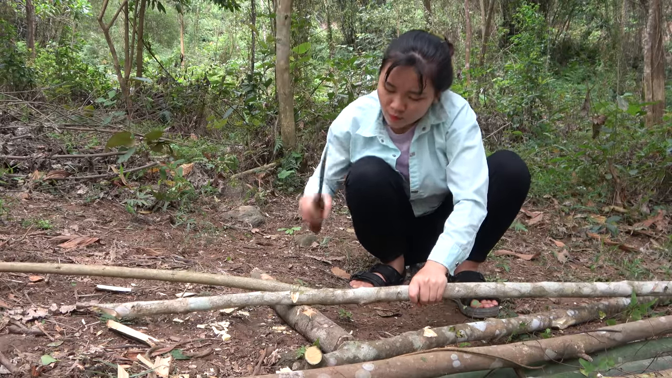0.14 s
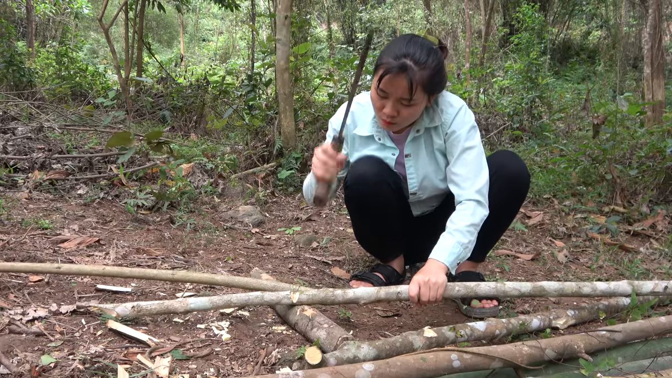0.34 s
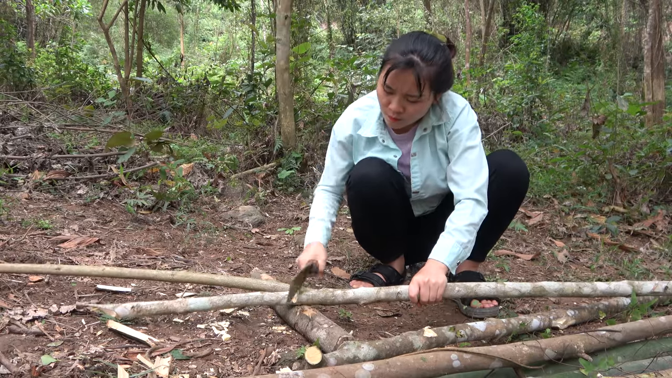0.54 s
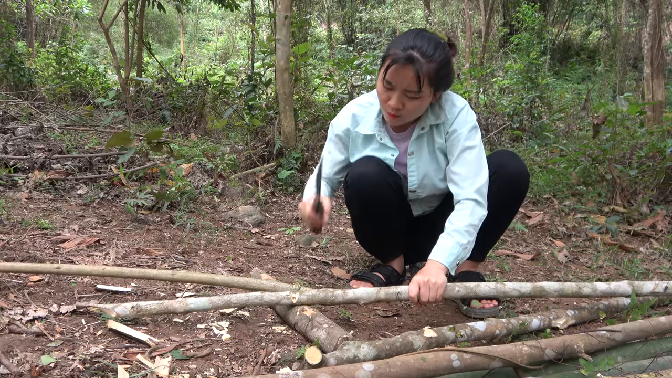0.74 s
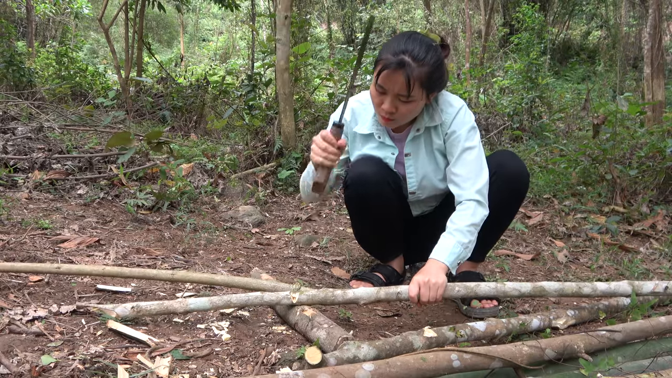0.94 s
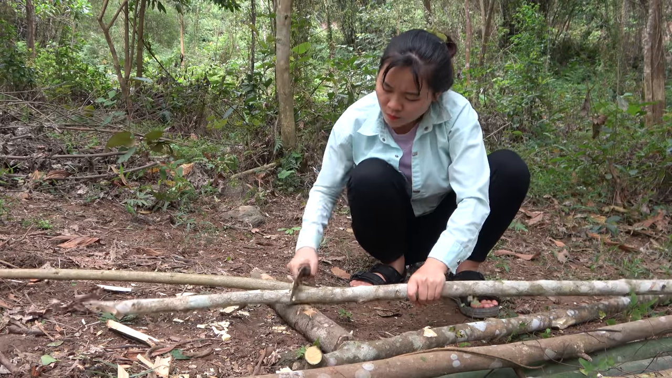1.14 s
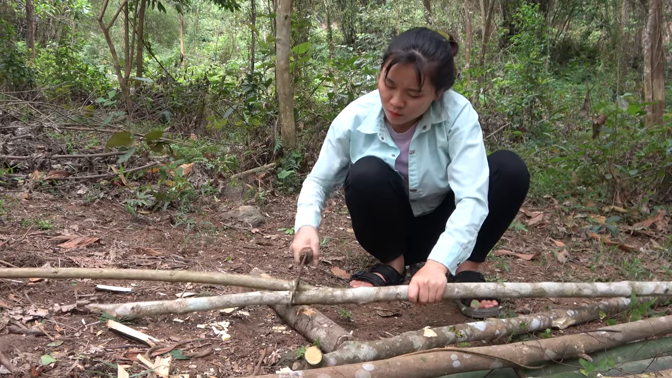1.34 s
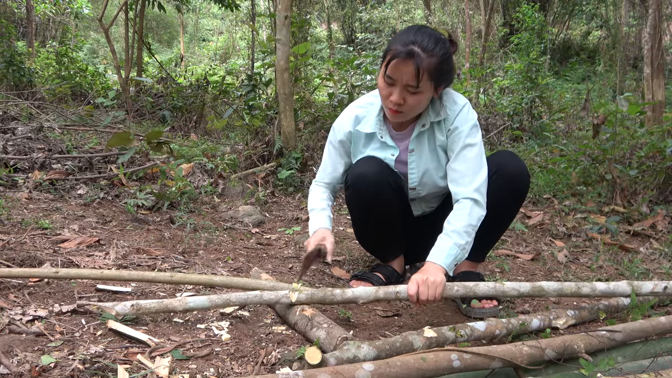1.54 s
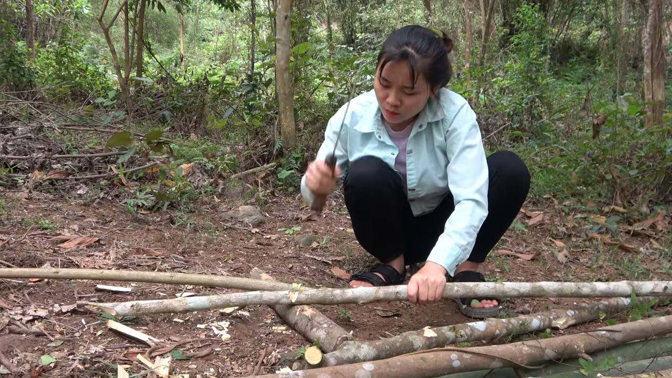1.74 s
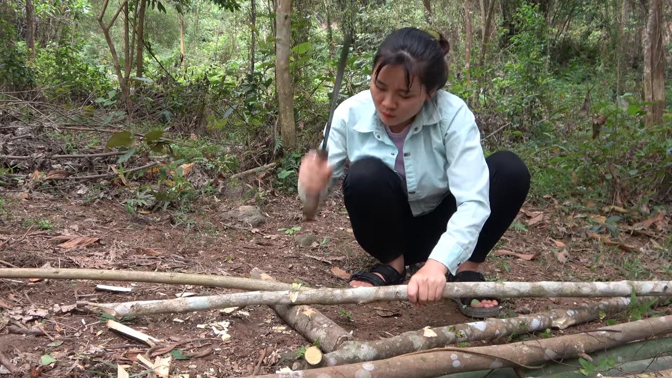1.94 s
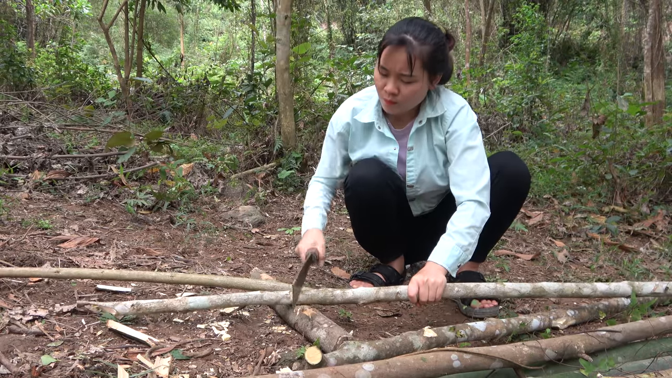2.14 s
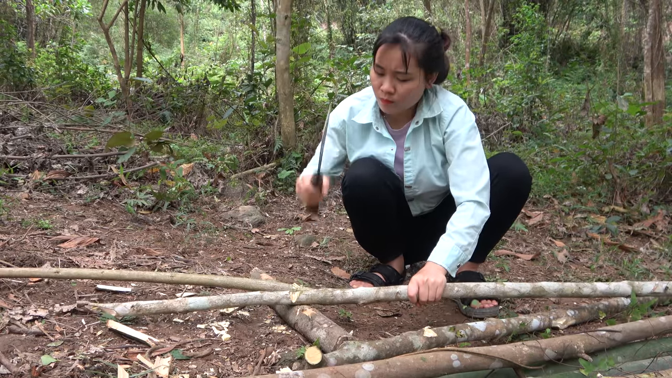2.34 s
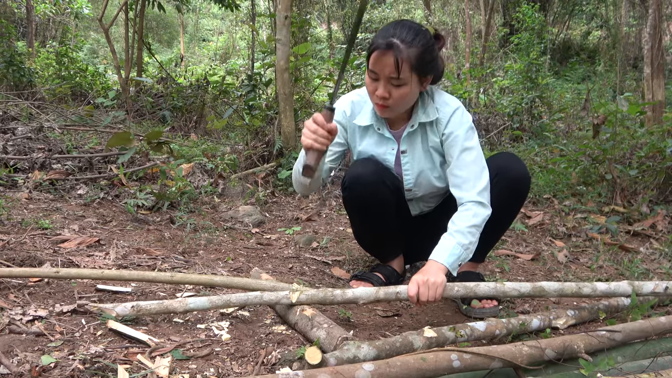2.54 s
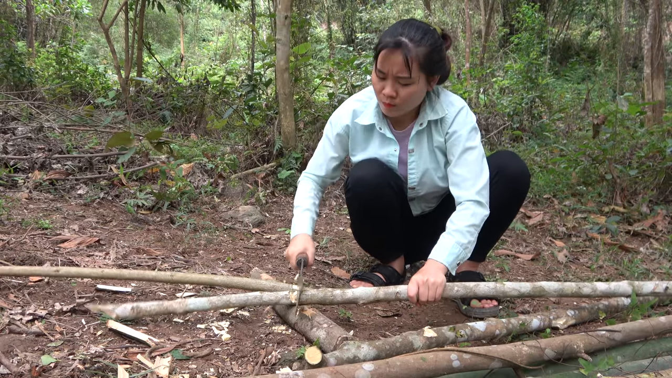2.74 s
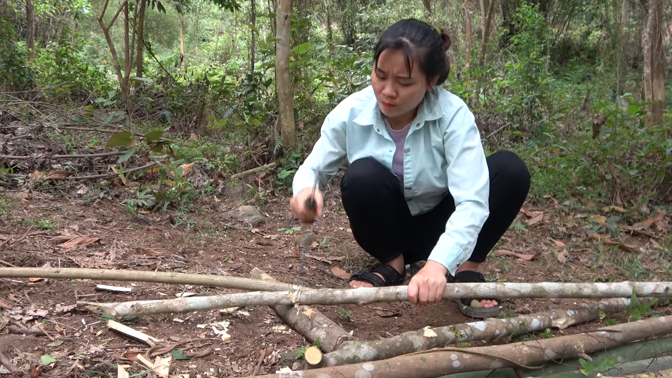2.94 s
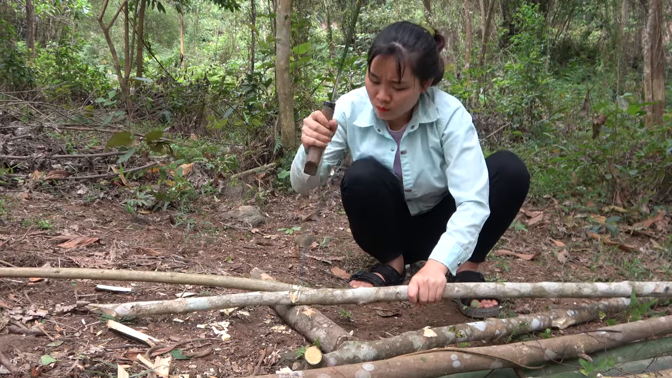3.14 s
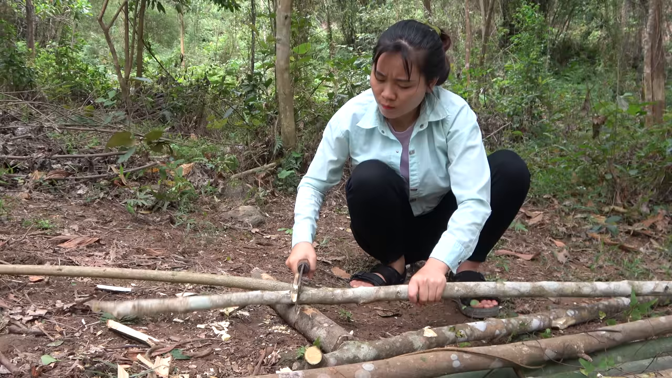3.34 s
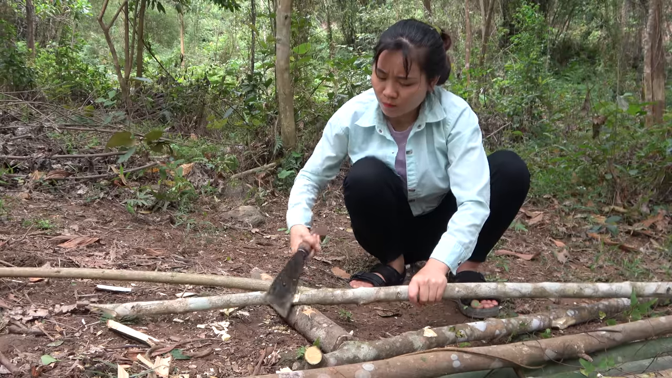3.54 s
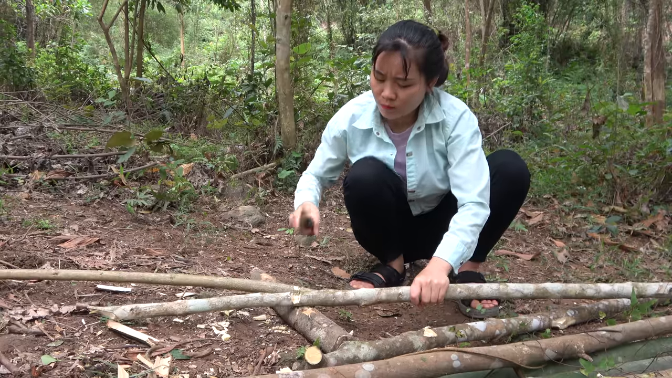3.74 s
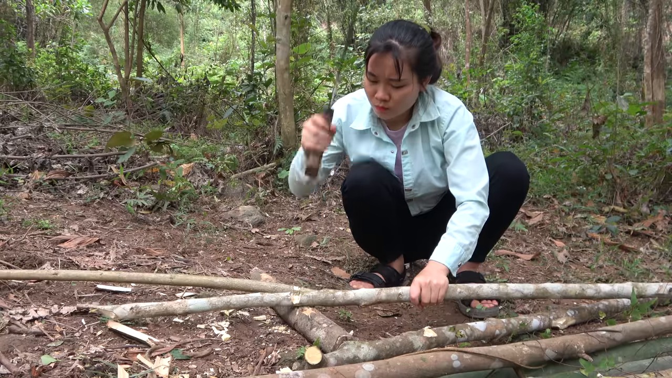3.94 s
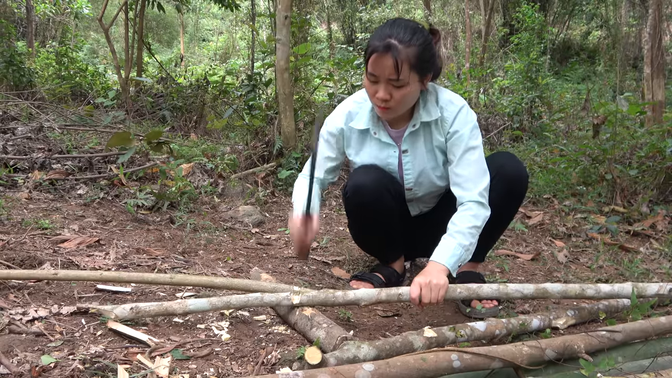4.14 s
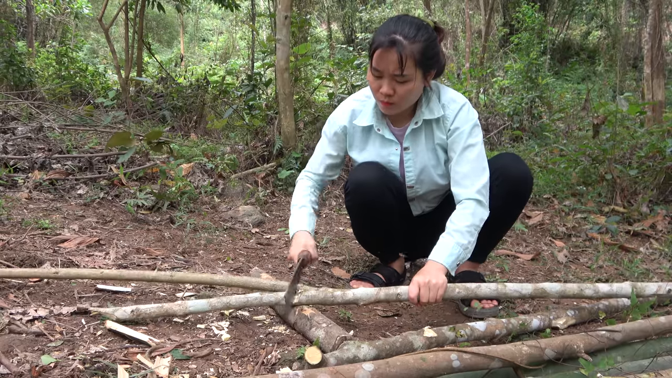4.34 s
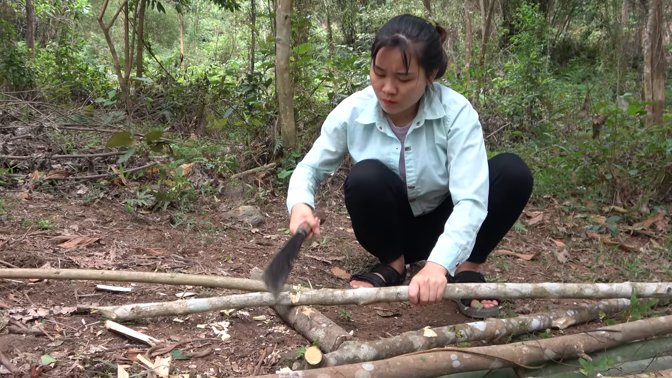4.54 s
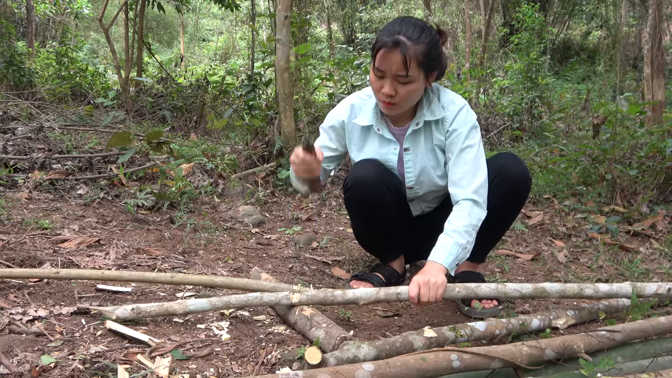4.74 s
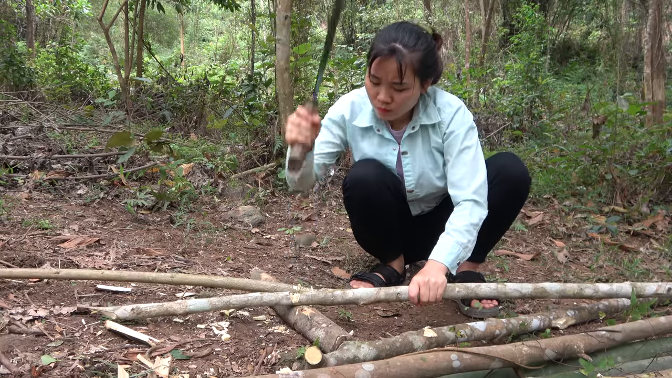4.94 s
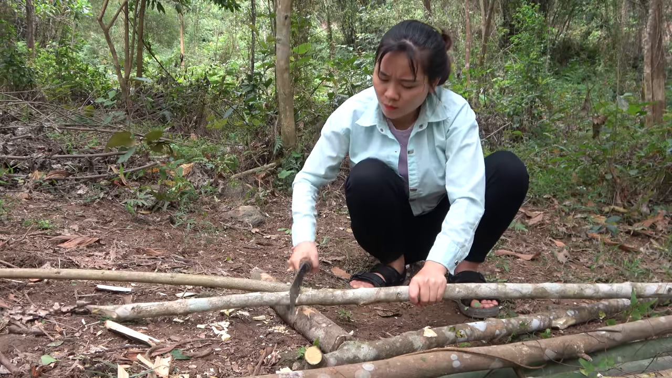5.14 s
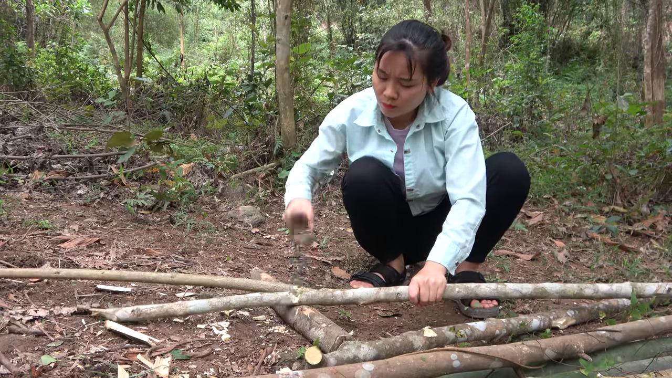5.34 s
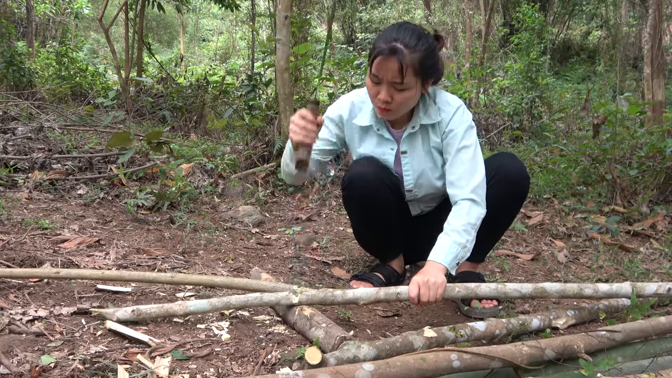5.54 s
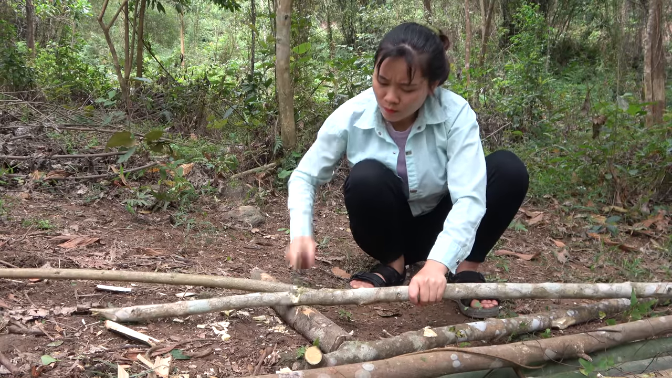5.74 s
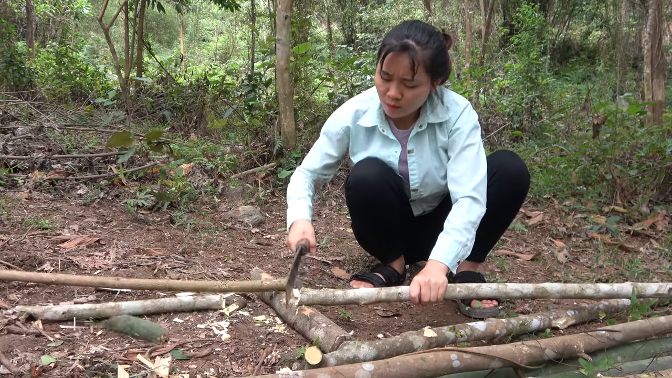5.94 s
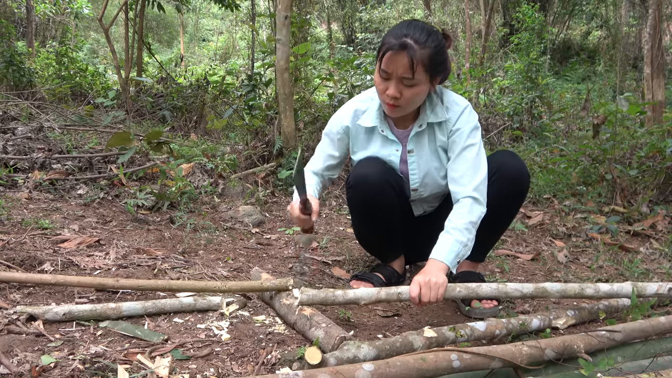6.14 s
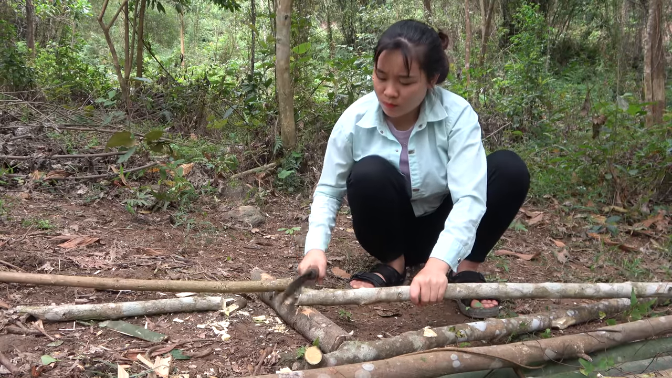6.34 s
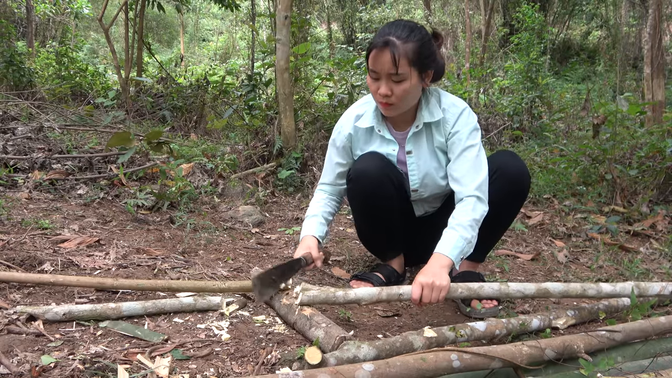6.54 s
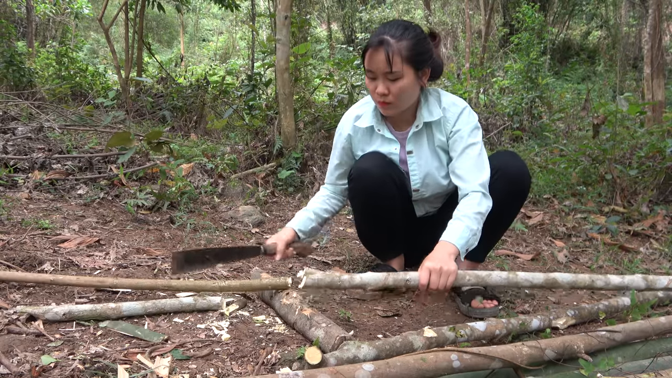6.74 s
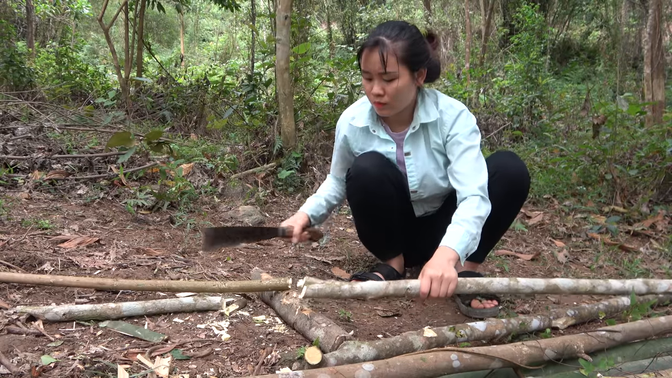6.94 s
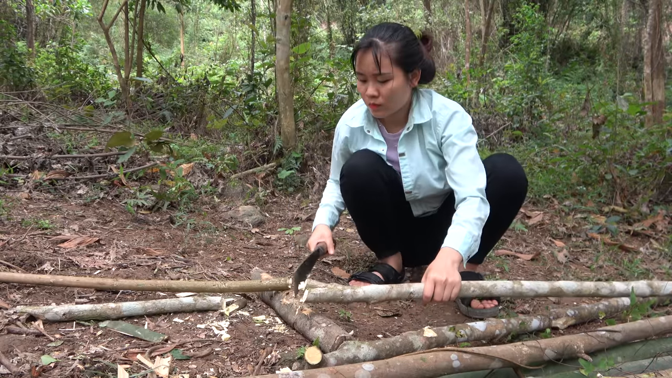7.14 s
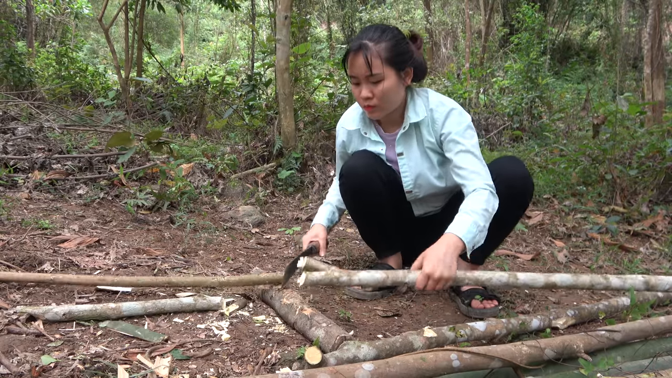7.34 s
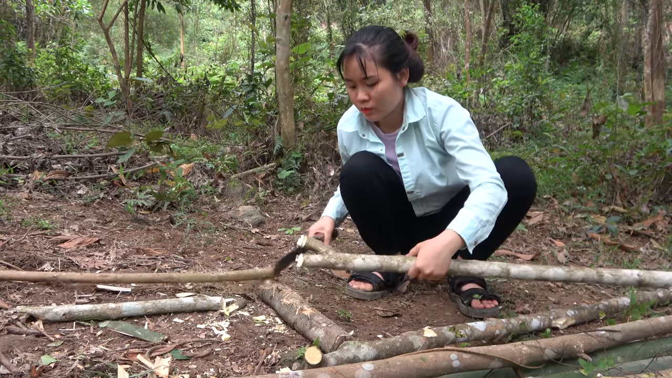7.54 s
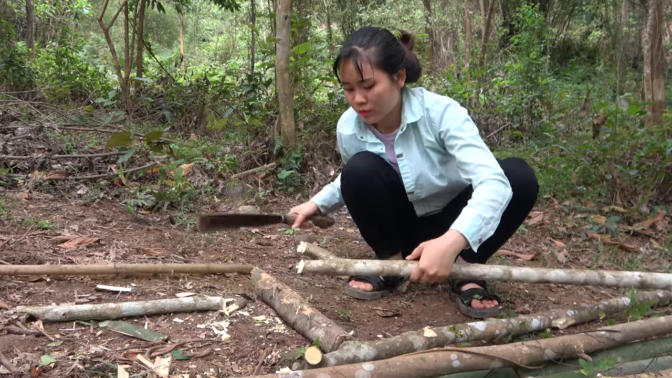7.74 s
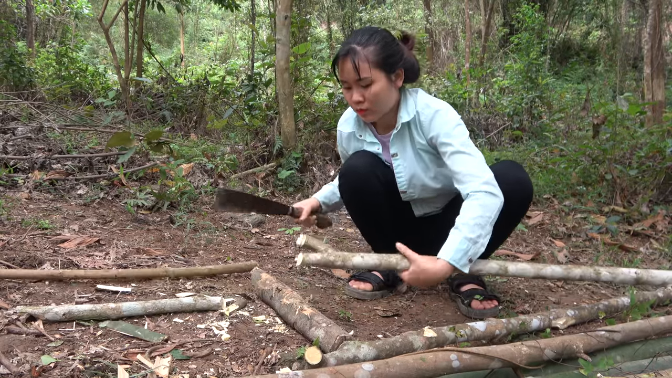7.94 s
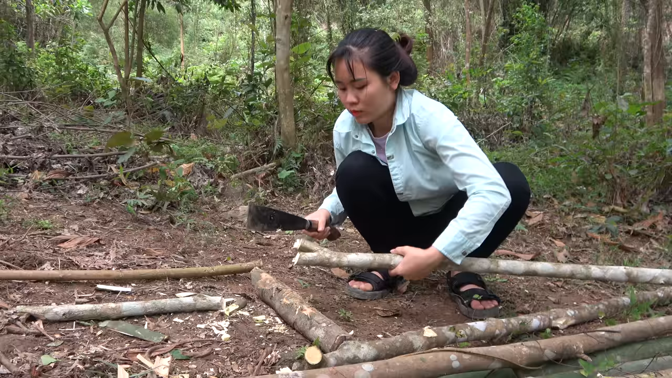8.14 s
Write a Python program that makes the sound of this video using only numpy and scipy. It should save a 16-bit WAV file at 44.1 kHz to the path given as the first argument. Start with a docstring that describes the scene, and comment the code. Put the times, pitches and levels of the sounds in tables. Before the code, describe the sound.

A heavy blade chops a thin wooden pole in separate woody cracks with hollow thumps, echoing among trees over a steady insect drone.

```python
"""Insects drone in narrow noise bands over a forest hush; a bird first repeats a falling whistle.
A machete meanwhile chops a thin pole lying across a log: shaped bursts crack the fibres and knock the wood,
decaying modes thump the ground and ring the bouncing pole, and dense scatter off the trunks echoes each blow.
The blade squeaks once after the third blow; chips snap and wood bumps between later ones.
After the tenth blow the free blade clinks, then the cut pole is lifted out of crackling leaf litter."""
import sys
import numpy as np
from scipy import signal
from scipy.fft import rfft, irfft, next_fast_len
from scipy.io import wavfile

SR = 44100
rng = np.random.default_rng(int(sys.argv[2]) if len(sys.argv) > 2 else 0)


def transcribe(signal):
    """Save signal, clipped to [-1, 1], as a 16-bit WAV file at the path in sys.argv[1]."""
    frames = np.atleast_2d(signal).T
    limited = np.clip(frames, -1, 1)
    pcm = np.round(limited * 32767).astype(np.int16)
    wavfile.write(sys.argv[1], SR, pcm)


N = 361619
CLOCK = np.arange(N) / SR  # whole scene, s
T = np.arange(3 * 2 ** 13) / SR  # one event, s


def undb(db):
    """Decibels to gain."""
    return 10 ** (np.asarray(db) / 20)


def unit(x):
    """Scale to rms 1."""
    return x / np.sqrt(np.mean(x ** 2))


def along(points, hz):
    """Read a table on a log-frequency axis."""
    f, value = np.transpose(points)
    return np.interp(np.log(hz), np.log(f), value)


def bell(hz, centre_hz, octaves):
    """A bell of height 1 on a log-frequency axis."""
    return np.exp(-.5 * (np.log2(hz / centre_hz) / octaves) ** 2)


def fall(t60_s):
    """Exponential decay by 60 dB in t60_s."""
    return np.exp(-np.log(1000) * T / t60_s)


def evenly(start_s, every_s, count):
    """Times at an even pace."""
    return start_s + every_s * np.arange(count)


def stereo(mid, side=0):
    """Left and right from mid and side."""
    return np.array([mid + side, mid - side])


def add(out, start_s, x):
    """Mix a stereo sound in at start_s, cut to the scene."""
    i = int(round(start_s * SR))
    lo, hi = max(i, 0), min(i + x.shape[1], N)
    out[:, lo:hi] += x[:, lo - i:hi - i]


def noise(gain, size):
    """Noise of rms 1 whose spectrum follows the function gain(hz)."""
    padded = next_fast_len(size)
    hz = np.fft.rfftfreq(padded, 1 / SR) + 1
    random_phase = np.exp(2j * np.pi * rng.random(len(hz)))
    return unit(irfft(gain(hz) * random_phase, padded)[:size])


def walk(rate_hz):
    """Smooth random wandering with a spread of 1."""
    return noise(lambda hz: np.exp(-(hz - 1) / rate_hz), N)


def coloured(x, gain):
    """Give white noise the spectrum gain(hz) and keep its power."""
    hz = np.fft.rfftfreq(len(T), 1 / SR) + 1
    return irfft(rfft(x) * unit(gain(hz)), len(T))


def burst(gain, length_s):
    """Dense splintering of colour gain(hz), peaking near rms 1 after half its length."""
    u = 2 * T / length_s
    return u * np.exp(1 - u) * coloured(rng.standard_normal(len(T)), gain)


def ring(modes, scatter_db, detune):
    """Modes that build up and decay; every call weights and detunes them a little differently."""
    out = 0
    for hz, level_db, t60_s, rise_s in modes:
        weight, shift, phase_cycles = rng.standard_normal(3)
        shape = (1 - np.exp(-(T / rise_s) ** 2)) * fall(t60_s)
        wave = np.sin(2 * np.pi * (hz * (1 + detune * shift) * T + phase_cycles))
        out = out + undb(level_db + scatter_db * weight) * shape * wave
    return out


# colour of the trunk scatter: pitch_hz, level_db
ECHO_COLOUR = [(60, -10), (250, -9), (600, -18.5), (1300, -7.5), (2600, -0.5), (5000, 0.5), (8000, -0.5),
               (15000, 1)]
# decay among the trunks: pitch_hz, t60_s
TRUNK_DECAY = [(100, 0.3), (600, 0.42), (1300, 0.26), (3000, 0.39), (6000, 0.37), (10000, 0.3),
               (15000, 0.21)]


def forest(first_s=.013, build_s=0.0068, late_db=-26, late_t60_s=1.0, side_db=-3):
    """Forest echo: a gap, then dense scatter off near trunks and a faint tail from far ones."""
    hz = np.fft.rfftfreq(len(T), 1 / SR) + 1
    white = stereo(rng.standard_normal(len(T)), undb(side_db) * rng.standard_normal(len(T)))
    scatter = rfft(white) * undb(along(ECHO_COLOUR, hz))
    late = undb(late_db) * fall(late_t60_s)
    centres_hz, t60s_s = np.transpose(TRUNK_DECAY)
    out = 0
    for t60_s, share in zip(t60s_s, np.eye(len(centres_hz))):
        # overlapping bands that sum to the full spectrum
        band = irfft(scatter * np.interp(np.log(hz), np.log(centres_hz), share), len(T))
        out = out + band * (fall(t60_s) + late)
    return out * np.clip((T - first_s) / build_s, 0, 1) * undb(-28.5)


def echo(x, trunks, db):
    """What the trunks send back of a mono sound, by convolution."""
    return undb(db) * signal.fftconvolve(x[None], trunks, axes=1)[:, :len(x)]


def hit(gain, length_s, echo_db, side_db=-6):
    """Burst plus echo; each trunk gets another side of it, so only the broad colour comes back."""
    direct = stereo(burst(gain, length_s), undb(side_db) * burst(gain, length_s))
    return direct + undb(echo_db) * np.sqrt(length_s * SR) * coloured(forest(), gain)


# spectrum of the forest hush: pitch_hz, level_db
HUSH_COLOUR = [(20, -12), (45, -8), (80, -2.5), (180, 0.5), (300, -1), (520, -9.5), (720, -6.5), (880, -8),
               (1100, -1.5), (2400, -5), (3800, -9.5), (6000, -17), (9500, -22.5), (15500, -34)]


def air(air_db=-53.5, side_db=2, left_db=-0.5):
    """Far hush of the forest, wide slowly wandering noise from all around."""
    mid, side = (noise(lambda hz: undb(along(HUSH_COLOUR, hz)), N) for _ in range(2))
    level = undb(air_db + .5 * walk(rate_hz=0.5))
    return stereo(mid, undb(side_db) * side) * level * undb([[left_db], [-left_db]])


# phrases of the lower chorus: start_s, release_start_s
CHORUS_PHRASES = [(-.3, 2.2), (2.5, 4.4), (5.05, 6.22), (6.6, 7.7)]
PHRASE_DB, PHRASE_ATTACK_S, PHRASE_RELEASE_S = 5.5, 0.17, .25  # level over the lull


def phrasing():
    """Gain of the lower chorus: each phrase swells, holds and sinks back into a lull."""
    singing = 0
    for start_s, release_start_s in CHORUS_PHRASES:
        attack = (CLOCK - start_s) / PHRASE_ATTACK_S
        release = 1 - (CLOCK - release_start_s) / PHRASE_RELEASE_S
        singing = singing + np.clip(np.minimum(attack, release), 0, 1)
    return undb(PHRASE_DB * singing)


# lower chorus, level in the lulls: centre_hz, width_hz, level_db
LOW_CHORUS = [(4474, 92, -67), (4610, 570, -66)]
# higher chorus: centre_hz, width_hz, level_db
HIGH_CHORUS = [(6960, 380, -63), (6750, 1020, -62), (7610, 98, -70)]


def insects(choruses, flutter_db, side_db):
    """Many distant stridulating insects blur into narrow fluttering bands."""
    out = 0
    for centre_hz, width_hz, level_db in choruses:
        def band(hz):
            return 1 / (1 + (2 * (hz - centre_hz) / width_hz) ** 2 / 2)

        mid, side = noise(band, N), noise(band, N)
        level = undb(level_db + flutter_db * walk(rate_hz=17))
        out = out + stereo(mid, undb(side_db) * side) * level
    return out


def drone():
    """Both choruses; only the lower one sings in phrases."""
    low = insects(LOW_CHORUS, flutter_db=2.0, side_db=-9.5) * phrasing()
    return low + insects(HIGH_CHORUS, flutter_db=0.5, side_db=-2.0)


SONG_START_S, NOTE_EVERY_S, LAST_NOTE_S, BIRD_DB = .006, .1207, 1.365, -42
NOTE_S, NOTE_FROM_HZ, NOTE_FALL_HZ_PER_S = 0.054, 6720, 68500


def bird():
    """Far falling whistles, each swelling and fading: an even run, a pause, one more; echo blurs them."""
    out = np.zeros((2, N))
    age_s = np.minimum(T, NOTE_S)
    swell = np.abs(np.sin(np.pi * age_s / NOTE_S)) ** 1.3
    pitch_hz = NOTE_FROM_HZ - NOTE_FALL_HZ_PER_S * age_s
    note = swell * np.sin(2 * np.pi * np.cumsum(pitch_hz) / SR)
    for start_s in [*evenly(SONG_START_S, NOTE_EVERY_S, count=10), LAST_NOTE_S]:
        blur = echo(note, forest(first_s=0.0029, late_db=-10), db=-2.6)
        add(out, start_s, stereo(undb(-0.5) * note) + blur)
    return out * undb(BIRD_DB) * undb([[1.5], [-1.5]])  # sits to the left


# spectrum of leaves and cloth: pitch_hz, level_db
LITTER_COLOUR = [(300, 1.5), (2000, -5), (5000, -5), (10000, -7.5), (15500, -15)]
# movements that stir leaves and sleeves: middle_s, half_length_s, level_db
MOVEMENTS = [(7.056, 0.033, -64), (7.492, 0.14, -60), (7.72, 0.069, -55), (8.125, 0.039, -57)]
STILL_LITTER_DB = -65


def litter(grain_db=3.0):
    """Dry leaves and cloth crackle as the pole is shifted; each movement swells and dies away."""
    def crackle():
        grain = undb(grain_db * walk(rate_hz=160))
        return unit(noise(lambda hz: undb(along(LITTER_COLOUR, hz)), N) * grain)

    level = undb(STILL_LITTER_DB)
    for middle_s, half_s, level_db in MOVEMENTS:
        level = level + undb(level_db) * np.exp(-((CLOCK - middle_s) / half_s) ** 2)
    return stereo(crackle(), undb(-3) * crackle()) * level


# chips and twigs snap: start_s, level_db, length_s, centre_hz
CHIP_SNAPS = [(3.48, -29, 0.0022, 7400), (4.342, -12.5, 0.0006, 7200), (4.4924, -23.5, 0.005, 4250),
              (7.736, -44, 0.0071, 7400), (7.756, -43.5, .0051, 6700), (7.823, -47.5, 0.0055, 9000),
              (8.102, -48, 0.0055, 7000)]
SNAP_OCTAVES, SNAP_ECHO_DB = 0.91, -10.5
# blade, offcut and pole bump wood and ground: start_s, level_db, length_s, centre_hz
WOOD_BUMPS = [(4.497, -36, 0.0077, 1110), (5.993, -40.5, 0.018, 520), (7.292, -42, .0069, 453),
              (7.828, -46, 0.0086, 168)]
BUMP_OCTAVES, BUMP_ECHO_DB = 1.25, 1
BARK_DB, BARK_S, BARK_HZ = -5, 0.0041, 4500  # level over the bump


def handling():
    """Light contacts: chips snap brightly, wood bumps dully with a tick of bark."""
    out = np.zeros((2, N))
    for start_s, level_db, length_s, centre_hz in CHIP_SNAPS:
        snap = hit(lambda hz: bell(hz, centre_hz, SNAP_OCTAVES), length_s, SNAP_ECHO_DB)
        add(out, start_s, undb(level_db) * snap)
    for start_s, level_db, length_s, centre_hz in WOOD_BUMPS:
        dull = hit(lambda hz: bell(hz, centre_hz, BUMP_OCTAVES), length_s, BUMP_ECHO_DB)
        bark = hit(lambda hz: bell(hz, BARK_HZ, octaves=0.86), BARK_S, BUMP_ECHO_DB)
        add(out, start_s, undb(level_db) * dull)
        add(out, start_s, undb(level_db + BARK_DB) * bark)
    return out


SQUEAK_START_S = 1.444


def squeak(trunks, squeak_db=-38, length_s=0.007, base_from_hz=3850, base_to_hz=4480):
    """Steel rubs as it is pulled from the cut: harmonics 2 and 3 of a rising base, plus grit."""
    u = np.clip(T / length_s, 0, 1)
    phase = 2 * np.pi * np.cumsum(base_from_hz + (base_to_hz - base_from_hz) * u) / SR
    friction = np.sin(2 * phase) + np.sin(3 * phase)
    grit = coloured(rng.standard_normal(len(T)), lambda hz: bell(hz, 11000, octaves=.7))
    rub = undb(squeak_db) * np.sin(np.pi * u) * (friction + undb(-10) * grit)
    return stereo(rub) + echo(rub, trunks, db=-7.5)


# modes of the blade: pitch_hz, level_db, t60_s, rise_s
BLADE_MODES = [(2560, -6, 0.062, .001), (2920, -3, 0.044, .001), (3960, -1, 0.075, 0.00091),
               (5440, 1, 0.078, .001), (9740, 8, 0.022, 0.0011), (10500, -2, 0.096, .001),
               (12800, -16, .09, .001), (14900, -9, .03, .001)]
# the free blade clinks: start_s, level_db
BLADE_CLINKS = [(6.812, -41), (6.824, -43)]
SCRAPE_DB, SCRAPE_S, SCRAPE_HZ, SCRAPE_OCTAVES = 2, 0.0062, 6000, 5.3  # level over the clink


def blade(trunks):
    """Steel squeaks once, and later clinks against the wood, each clink with a short scrape on bark."""
    out = np.zeros((2, N))
    add(out, SQUEAK_START_S, squeak(trunks))
    for start_s, level_db in BLADE_CLINKS:
        clink = undb(level_db) * ring(BLADE_MODES, scatter_db=1.5, detune=0.0035)
        scrape = hit(lambda hz: bell(hz, SCRAPE_HZ, SCRAPE_OCTAVES), SCRAPE_S, echo_db=-11)
        add(out, start_s, stereo(clink) + echo(clink, trunks, db=-13))
        add(out, start_s, undb(level_db + SCRAPE_DB) * scrape)
    return out


# modes of the supporting log on soft earth: pitch_hz, level_db, t60_s, rise_s
GROUND_MODES = [(75.2, -3.5, 0.16, 0.0035), (98, -19.5, 0.31, 0.0089), (160, -5, 0.11, 0.017),
                (194, -9, 0.08, 0.011)]
THUD_DB, THUD_S, THUD_HZ, THUD_OCTAVES, THUMP_DB = -10.5, 0.012, 163.2, 0.35, -7  # levels over the force


def ground(force_db, echo_db, trunks):
    """The soil under the log gives a dull thud, and the log on it rings in low modes."""
    thud = hit(lambda hz: bell(hz, THUD_HZ, THUD_OCTAVES), THUD_S, echo_db, side_db=2.5)
    thump = undb(force_db + THUMP_DB) * ring(GROUND_MODES, scatter_db=1, detune=0.04)
    return undb(force_db + THUD_DB) * thud + stereo(thump) + echo(thump, trunks, echo_db)


# bending modes of the pole: pitch_hz, level_db, t60_s, rise_s
POLE_MODES = [(272.5, -22, 0.24, 0.011), (325.3, -8.5, 0.21, 0.027), (411.2, -9, 0.18, 0.023),
              (492.7, 8, 0.16, 0.037), (508.6, 9.5, 0.096, 0.036), (554, -6, 0.17, 0.029),
              (610.6, 0.5, 0.13, 0.024), (698, 0, 0.14, 0.038), (700, 7.5, 0.1, 0.029),
              (743, -10, 0.19, 0.0059), (896, -4.5, 0.14, 0.021), (1006, 2, 0.1, 0.016),
              (1043, -10, 0.18, 0.0069), (1217, -12, 0.081, 0.0044), (1357, -23, 0.16, 0.014),
              (1560, -2, 0.056, 0.0062)]
RING_DB = 0.5  # over the bounce


def pole(bounce_db, echo_db, trunks):
    """The struck pole bends and rings in its modes."""
    tone = undb(bounce_db + RING_DB) * ring(POLE_MODES, scatter_db=1.5, detune=.011)
    return stereo(tone) + echo(undb(-5) * tone, trunks, echo_db)


# spectrum of struck wood: pitch_hz, level_db
WOOD_COLOUR = [(80, -15), (200, -2), (400, -3.5), (700, -1.5), (1400, 0), (2000, -4), (3200, -10),
               (5000, -16.5), (12000, -29.5)]
WOOD_ECHO_DB = -1.5  # over the blow's echo


def wood(height_db, centre_hz, octaves, length_s, echo_db):
    """Struck wood: a burst with one raised resonance."""
    def colour(hz):
        return undb(along(WOOD_COLOUR, hz) + height_db * bell(hz, centre_hz, octaves))

    return hit(colour, length_s, echo_db + WOOD_ECHO_DB)


SLAP_DB, SLAP_S, SLAP_HEIGHT_DB = -6, .013, 10  # level over the bounce
REBOUND_AFTER_S, REBOUND_S_PER_GAIN = .013, .05


def slap(bounce_db, slap_hz, echo_db):
    """The pole slaps back on the log; wood on wood is hollower than steel on wood."""
    return undb(bounce_db + SLAP_DB) * wood(SLAP_HEIGHT_DB, slap_hz, 0.33, SLAP_S, echo_db)


KNOCK_S, KNOCK_HZ, KNOCK_HEIGHT_DB = 0.0084, 1220, 7


def knock(force_db, echo_db):
    """The stopped blade knocks the wood with the force of the blow."""
    return undb(force_db) * wood(KNOCK_HEIGHT_DB, KNOCK_HZ, 0.17, KNOCK_S, echo_db)


# spectrum of the entering edge: pitch_hz, level_db
EDGE_COLOUR = [(500, 1.5), (2500, 4), (5000, 4.5), (10000, 2.5), (13000, -5.5), (15500, -7)]
EDGE_DB, EDGE_S = 1, .0011  # level over the crack
# spectrum of splitting fibres: pitch_hz, level_db
CRACK_COLOUR = [(200, 3.5), (900, -12), (2000, -5.5), (3500, -1), (5300, -3.5), (7000, -0.5), (8500, -5),
                (11500, -6.5), (15500, -14)]
CRACK_S, CRACK_SHARE_OF_BITE, SPLIT_OCTAVES = .0029, 0.19, 0.17


def crack(crack_db, bite_s, split_hz, split_height_db, echo_db):
    """The edge ticks as it enters; fibres crack for longer the longer the blade takes to stop."""
    def fibres(hz):
        return undb(along(CRACK_COLOUR, hz) + split_height_db * bell(hz, split_hz, SPLIT_OCTAVES))

    tick = undb(EDGE_DB) * hit(lambda hz: undb(along(EDGE_COLOUR, hz)), EDGE_S, echo_db)
    return undb(crack_db) * (tick + hit(fibres, CRACK_S + CRACK_SHARE_OF_BITE * bite_s, echo_db))


# blows: start_s, force_db, bite_s (until the blade stops), crack_db, split_hz, split_height_db,
# bounce_db (of the pole), slap_hz, echo_db
BLOWS = [(-0.033, -19.5, 0.0055, -23.5, 2470, 9, -21.5, 346, -0.5),
         (0.5563, -18, 0.016, -15.5, 3440, 13.5, -19.5, 600, -1.5),
         (1.1851, -17.5, 0.006, -17, 3180, 5.5, -18.5, 590, 0.5),
         (2.1246, -17, 0.0052, -15.5, 2350, 19, -15, 553, -2),
         (2.7815, -23, 0.0052, -17.5, 3850, 5, -21.5, 595, 2),
         (3.3981, -15, 0.0055, -18.5, 2600, 1, -16, 760, -1.5),
         (4.2820, -16.5, .005, -14, 2420, 10.5, -17.5, 615, 0),
         (5.163, -16, 0.0051, -19, 2840, 4, -11.5, 420, -1),
         (5.859, -20, 0.0057, -20, 2740, 7.5, -24, 696, 6),
         (6.4456, -24, .005, -18, 3500, -2, -26.5, 430, -9.5)]


def chops(trunks):
    """The edge bites, fibres split, the blade stops in the wood, and the pole bounces and rings."""
    out = np.zeros((2, N))
    for (start_s, force_db, bite_s, crack_db, split_hz, split_height_db,
         bounce_db, slap_hz, echo_db) in BLOWS:
        # a stronger bounce stays up longer
        lands_s = start_s + REBOUND_AFTER_S + REBOUND_S_PER_GAIN * undb(bounce_db)
        add(out, start_s, crack(crack_db, bite_s, split_hz, split_height_db, echo_db))
        add(out, start_s + bite_s, knock(force_db, echo_db))
        add(out, start_s, ground(force_db, echo_db, trunks))
        add(out, start_s, pole(bounce_db, echo_db, trunks))
        add(out, lands_s, slap(bounce_db, slap_hz, echo_db))
    return out


def scene():
    """The living forest behind, the work in front."""
    trunks = forest()
    background = air() + drone() + bird()
    return background + litter() + handling() + blade(trunks) + chops(trunks)


# side level of the close microphone pair: pitch_hz, side_db
PAIR_WIDTH = [(80, -14.5), (200, -13), (500, -13), (1200, -15.5), (2500, -18), (4500, -13), (7000, -2),
              (12000, -5)]
# tilt of the pair: pitch_hz, left_minus_right_db
PAIR_BALANCE = [(80, 1.5), (200, 0), (400, -5.5), (700, -1.1), (1200, -5), (2400, -3), (4500, 0.3),
                (7000, 0.9), (12000, 0.5)]


def record(dry, low_hz=48, peak=.75, top_hz=15700):
    """Close microphones narrow and colour the image; the recorder thins bass, rounds peaks, cuts the top."""
    hz = np.fft.rfftfreq(2 ** 19, 1 / SR) + 1
    left, right = rfft(dry, 2 * len(hz) - 2)
    pair = stereo(left + right, (left - right) * undb(along(PAIR_WIDTH, hz))) / 2
    tilt = undb(stereo(0, along(PAIR_BALANCE, hz) / 2))
    heard = irfft(pair * tilt)[:, :N]
    thinned = signal.sosfilt(signal.butter(2, low_hz, "high", fs=SR, output="sos"), heard)
    rounded = peak * np.tanh(thinned / peak)
    return signal.sosfilt(signal.ellip(10, .2, 80, top_hz, fs=SR, output="sos"), rounded)


dry = scene()
out = record(dry)
transcribe(out)
```